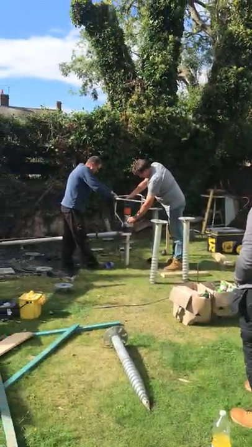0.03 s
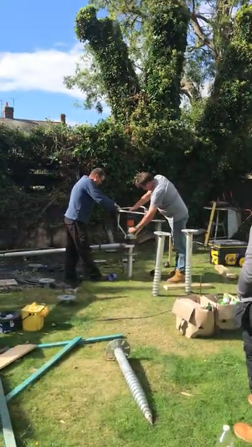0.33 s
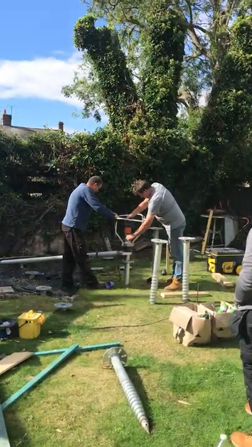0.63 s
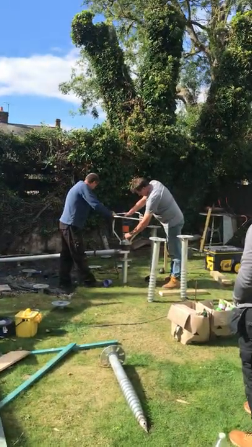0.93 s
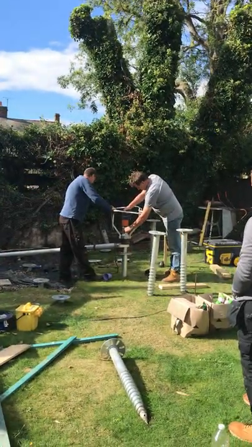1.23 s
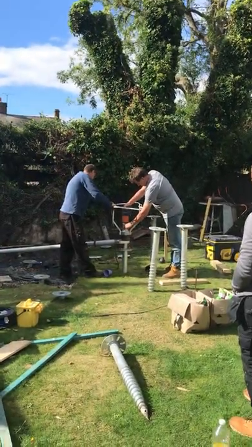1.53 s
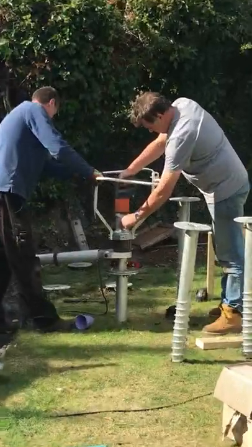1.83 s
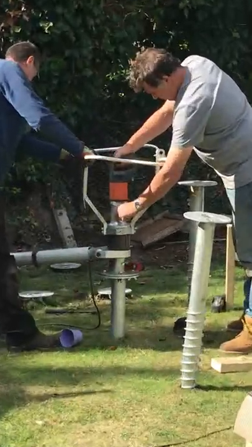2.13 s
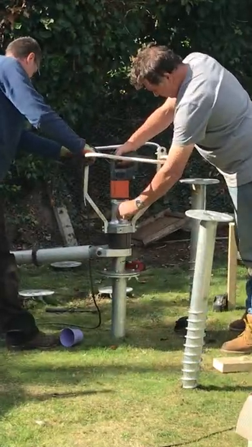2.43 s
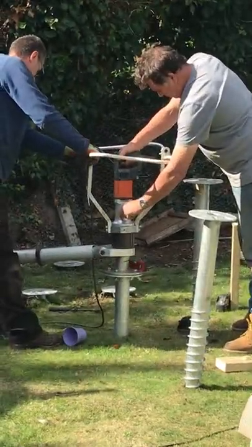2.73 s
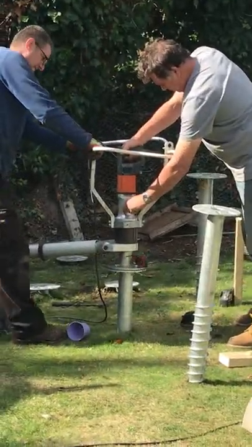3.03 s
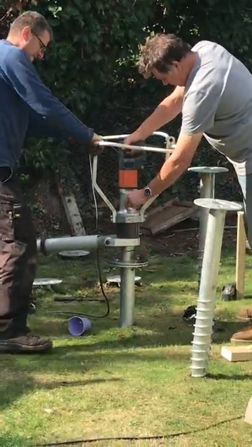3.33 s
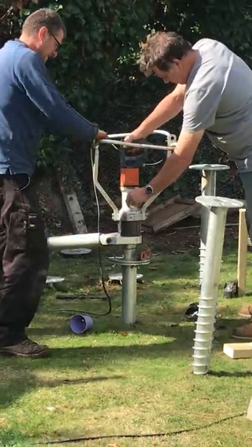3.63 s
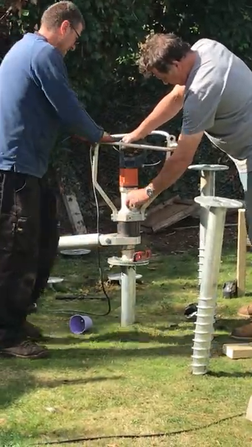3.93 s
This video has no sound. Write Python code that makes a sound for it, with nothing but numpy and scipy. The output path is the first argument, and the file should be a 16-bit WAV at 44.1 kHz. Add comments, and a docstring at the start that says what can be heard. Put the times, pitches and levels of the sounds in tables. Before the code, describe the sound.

Loud, steady whir of an electric ground screw driver, switched off at the very end.

```python
"""An electric ground-screw driver runs under load in an open garden, then is switched off and coasts down.
Its reduction gears sing and chatter in their housing, its armature, fan and commutator whine,
and the brushes hiss in step with the mains over a rush of cooling air. Turning metal squeals briefly.
Behind it, a faint breeze and a few puffs of wind touch the microphone."""
import sys
import numpy as np
from scipy.fft import rfft, irfft, next_fast_len
from scipy.io import wavfile
from scipy.ndimage import map_coordinates

SR = 44100
rng = np.random.default_rng(int(sys.argv[2]) if len(sys.argv) > 2 else 0)


def put_to_file(sound):
    """Save the sound as 16-bit audio at rate SR, in the file named by the first command-line argument."""
    columns = np.atleast_2d(sound).T  # one column per channel
    safe = np.clip(columns, -1, 1)
    whole_steps = np.round(safe * 32767)
    wavfile.write(sys.argv[1], SR, whole_steps.astype(np.int16))


N = 176400

OFF_S, COAST_HZ_PER_S = 3.771, 572  # switch-off, and how fast the armature then slows
MAINS_HZ, TOP_HZ = 50, 15780
# the three gear stages' mesh rates and a slow wheel's rate, as multiples of armature speed
LOW_MESH, MID_MESH, HIGH_MESH, WHEEL_RATIO = 3.509, 7.182, 7.917, .05317
SLOTS, BARS = 14, 40  # armature slots, commutator bars


def gear_whine(turns):
    """Three stages sing at their mesh rates and rattle once the power is off; the slowest also growls."""
    # envelopes of the three mesh tones and the growl: time_s, level_db
    low_level = [(0, -46), (.6, -40), (1.1, -44), (1.6, -37), (2.15, -36.5), (2.4, -46), (3.1, -44),
                 (3.35, -41.5), (3.78, -45), (3.86, -52), (3.95, -48), (4, -57)]
    mid_level = [(0, -38), (.9, -40.5), (1.9, -36.5), (2.6, -40), (3.1, -36.5), (3.77, -41.5), (3.835, -47),
                 (3.865, -31), (3.92, -47), (4, -53)]
    high_level = [(0, -35), (.6, -34), (1, -36), (2, -36.5), (2.65, -34.5), (3.77, -36), (3.87, -45),
                  (3.95, -37), (4, -42)]
    growl_level = [(0, -54), (.9, -45), (1.8, -48), (2.7, -43), (3.4, -49), (3.78, -41.5), (3.86, -55)]
    # harmonics 2, 3 and 4 of the high mesh: relative_db
    overtones_db = [-19.5, -21.5, -38]
    low = envelope(low_level) * tone(LOW_MESH * turns, drift_db=1.6, flutter=.2)
    sidebands = sum(tone((LOW_MESH + k * WHEEL_RATIO) * turns, drift_db=1.5, flutter=.4) for k in (2, 3))
    growl = envelope(growl_level) * sidebands
    mid = envelope(mid_level) * tone(MID_MESH * turns, drift_db=-.4, flutter=.16)
    mid *= wheel_load(turns, swing=.16)
    overtones = sum(amp(db) * tone(k * HIGH_MESH * turns, drift_db=2.5, flutter=.1)
                    for k, db in enumerate(overtones_db, 2))
    high = envelope(high_level) * (tone(HIGH_MESH * turns, drift_db=0, flutter=.086) + overtones)
    backlash = .45 * np.clip((clock() - OFF_S) / .03, 0, 1)  # flutter depth as the teeth run slack
    return growl + sum(stage * (1 + backlash * wobble(250)) for stage in (low, mid, high))


def gear_chatter(turns):
    """Each tooth scrapes through its contact, in irregular surges, and rings the housing."""
    # housing resonances: pitch_hz, width_hz, relative_db
    housing_modes = [(806, 116, -5.5), (1076, 103, -1), (1176, 80, -6), (1344, 60, -12.5), (1728, 170, -6),
                     (2070, 105, -2), (4180, 380, -14)]
    # chatter envelope: time_s, level_db
    chatter_level = [(0, -36.5), (.9, -37), (1.7, -36.5), (2.7, -36), (3.77, -36.5), (4, -48)]

    def housing(f):
        modes = sum(amp(db) * resonance(f, hz, width) for hz, width, db in housing_modes)
        return modes / (1 + (560 / (f + 1)) ** 10)  # steep low cut at 560 Hz

    contact = 1 + cycle(LOW_MESH * turns)
    scrape = rng.standard_normal(N) * np.exp(.12 * wobble(30)) * wheel_load(turns, swing=.26)
    return envelope(chatter_level) * unit(filtered(contact * scrape, housing))


def wheel_load(turns, swing):
    """Tooth pressure swells and eases within each turn of a slow gear wheel."""
    # pressure swings once, twice and three times a wheel turn: weight
    swells = [0.43, 0.66, 1]
    wheel_turns = WHEEL_RATIO * turns
    pressure = sum(weight * cycle(k * wheel_turns) for k, weight in enumerate(swells, 1))
    return unit(np.exp(swing * pressure))


def motor(turns, pace):
    """Unbalance hum, armature and fan tones, the slots' magnetic whine and a thin ring near 3 kHz."""
    # armature and fan tones: speed_multiple
    shaft_orders = [2, 5, 9, 13, 15, 16, 22, 25, 30]
    # the same tones at running speed: level_db
    shaft_db = [-51, -53.5, -56, -55, -55, -58, -58.5, -55.5, -63]
    # envelopes of the slot whine and the ring: time_s, level_db
    slot_level = [(0, -43.5), (.8, -46.5), (1.7, -45.5), (2.45, -41), (2.9, -46), (3.3, -43.5), (3.76, -47),
                  (3.82, -57)]
    ring_level = [(0, -52), (.65, -43), (1.1, -52), (2.1, -48.5), (2.8, -54), (3.8, -48), (4, -60)]
    hum = amp(-58.5) * tone(turns, drift_db=.5, flutter=.071)
    shaft = sum(amp(db) * tone(k * turns, drift_db=.9, flutter=.087)
                for k, db in zip(shaft_orders, shaft_db))
    slots = tone(SLOTS * torque_ripple(turns), drift_db=.4, flutter=.14)
    slots *= envelope(slot_level) * mains_pulse(depth=.39)
    sideband = tone(SLOTS * turns - 2 * MAINS_HZ * clock(), drift_db=1.5, flutter=.17)
    sideband *= amp(-50.5) * (clock() < OFF_S)
    ring = tone(10 * turns, drift_db=.5, flutter=.15)
    ring += amp(-7) * tone(11 * turns, drift_db=0, flutter=.3)
    return hum + shaft * pace ** 5 + slots + sideband + envelope(ring_level) * ring


def mains_pulse(depth):
    """The current peaks twice per mains cycle until the switch is released."""
    return 1 + depth * (clock() < OFF_S) * np.cos(2 * np.pi * 2 * MAINS_HZ * clock())


def torque_ripple(turns, swing_turns=.0022):
    """The armature hurries a little with each peak of the current."""
    return turns + swing_turns * (mains_pulse(depth=1) - 1)


def commutator(turns):
    """The bars whistle under the brushes and buzz at each peak of the current."""
    # envelopes of the whistle and the octave below it: time_s, level_db
    whistle_level = [(0, -38.5), (.5, -38.5), (.7, -43.5), (.9, -39), (1.2, -40.5), (1.35, -44),
                     (1.75, -38), (1.9, -44), (2.35, -41.5), (2.95, -49), (3.4, -39), (3.65, -40.5),
                     (3.78, -45), (3.86, -37), (3.93, -45), (4, -58)]
    sub_octave_level = [(0, -50), (1, -54.5), (2.6, -49.5), (2.9, -56), (3.45, -58), (3.6, -46),
                        (3.85, -60)]
    bar_passes = BARS * torque_ripple(turns)
    whistle = envelope(whistle_level) * tone(bar_passes, drift_db=1, flutter=.15)
    sub_octave = envelope(sub_octave_level) * tone(bar_passes / 2, drift_db=2.5, flutter=.11)
    current_peaks = (mains_pulse(depth=1) / 2) ** 8
    buzz = amp(-51) * unit(current_peaks * cycle((BARS + 1) * turns))
    return whistle + sub_octave + buzz


def brushes(turns):
    """Hiss that pulses with the current and with each turn, and a bright sizzle while the screw bites."""
    # colour of the hiss: frequency_hz, relative_db
    hiss_colour = [(2000, -21), (5000, -2.5), (5700, -5.5), (6350, 2.5), (6850, -1.5), (7400, 1.5),
                   (7850, -4.5), (8400, 4.5), (9900, -1), (10400, -4), (11200, -2.5), (12300, 0),
                   (13200, -6.5), (14200, -8), (15700, -10)]
    # envelopes of the hiss and the sizzle: time_s, level_db
    hiss_level = [(0, -36.5), (.5, -37.5), (.75, -39), (.95, -37.5), (1.35, -38.5), (1.7, -38.5),
                  (2.8, -38.5), (3.7, -36.5), (3.87, -39.5), (4, -50)]
    sizzle_level = [(.85, -58), (1, -41.5), (2, -42), (2.6, -42.5), (3.3, -42.5), (3.55, -52)]
    sizzle = unit(filtered(rng.standard_normal(N), lambda f: resonance(f, hz=8890, width=2760) ** 4))
    hiss = envelope(hiss_level) * noise(hiss_colour) + envelope(sizzle_level) * sizzle
    pulsing = mains_pulse(depth=.04) * (1 + .08 * cycle(turns))
    return hiss * pulsing * amp(.34 * wobble(24.85))


def cooling_air(turns, pace):
    """The fan's rush, weaker as it slows."""
    # colour of the air and bearings: frequency_hz, relative_db
    rush_colour = [(150, -15), (260, -14.5), (350, -20.5), (490, -13), (600, -3.5), (780, 1.5), (920, 0.5),
                   (1200, 3), (1520, -2), (1750, 3), (1920, -3.5), (2400, -2), (2830, -1.5), (3250, 0),
                   (3600, -0.5), (4200, -0.5), (4950, -9.5), (5300, -5), (5700, -9), (8000, -14),
                   (16000, -19)]
    gain = amp(-35.5 + .22 * wobble(6.09)) * pace ** .89
    return gain * noise(rush_colour) * wheel_load(turns, swing=.069)


def squeals(turns):
    """Turning metal sings out for a moment, its pitch tied to the speed."""
    # metallic squeals: peak_s, half_length_s, speed_multiple, level_db
    squeal_cues = [(.28, .05, 11, -41), (3.6, .02, 10.8, -41), (3.825, 0.033, 25, -40.5)]
    return sum(amp(db) * swell(peak_s, half_s) * cycle(k * turns)
               for peak_s, half_s, k, db in squeal_cues)


def wind():
    """A faint breeze with short low puffs on the microphone."""
    # puffs of wind: peak_s, half_length_s, level_db
    puff_cues = [(0.637, .05, -53), (0.737, 0.017, -46), (0.999, 0.017, -36), (1.062, .04, -50),
                 (1.41, .025, -57), (1.64, .04, -60), (2.38, 0.026, -52), (3.79, .02, -46),
                 (3.92, .08, -54)]
    # colour of the wind rumble: frequency_hz, relative_db
    rumble_colour = [(20, -19), (33, -19), (45, 1), (70, -1), (110, -16.5), (200, -24.5), (500, -38)]
    puffs = sum(amp(db) * swell(peak_s, half_s) for peak_s, half_s, db in puff_cues)
    breeze = amp(-68.5 + 2.5 * wobble(8.2))
    return (breeze + puffs) * noise(rumble_colour)


def amp(db):
    """Decibels to gain."""
    return 10 ** (np.asarray(db) / 20)


def unit(x):
    """Scale to rms 1."""
    return x / np.sqrt(np.mean(x ** 2) + 1e-20)


def clock():
    """The time of every sample, in seconds."""
    return np.arange(N) / SR


def curve(rows):
    """(time_s, value) points joined by straight lines."""
    return np.interp(clock(), *np.transpose(rows))


def envelope(rows):
    """A gain that rides through (time_s, level_db) points."""
    return amp(curve(rows))


def swell(peak_s, half_length_s):
    """A bell-shaped fade in and out, 1 at its peak."""
    return np.exp(-((clock() - peak_s) / half_length_s) ** 2)


def wobble(rate):
    """A smooth random curve, rate knots a second."""
    return map_coordinates(rng.standard_normal(int(N * rate / SR) + 4), [clock() * rate])


def filtered(x, response):
    """Shape x with a complex frequency response."""
    size = next_fast_len(N + SR // 2)
    return irfft(rfft(x, size) * response(np.fft.rfftfreq(size, 1 / SR)), size)[:N]


def noise(colour):
    """Noise of rms 1 coloured by (frequency_hz, relative_db) points."""
    hz, db = np.transpose(colour)
    white = rng.standard_normal(N)
    return unit(filtered(white, lambda f: amp(np.interp(np.log(f + 1), np.log(hz), db))))


def resonance(f, hz, width):
    """Response of one resonance, 1 at its centre."""
    return 1j * f * width / (hz * hz - f * f + 1j * f * width)


def cycle(turns):
    """A sine that follows a count of turns, from a random start."""
    return np.sin(2 * np.pi * (turns + rng.random()))


def tone(turns, drift_db, flutter):
    """A machine tone of rms about 1: it drifts slowly in level and flutters in level and phase."""
    level = amp(drift_db * wobble(4.11)) * (1 + flutter * wobble(70))
    return np.sqrt(2) * level * cycle(turns + flutter * wobble(70) / (2 * np.pi))


def scene():
    """One armature speed drives every part of the machine; both channels hear the same."""
    # armature speed under load: time_s, turns_per_s
    loaded_speed = [(0, 298.1), (.5, 296.9), (.85, 296.1), (.95, 295.1), (1.5, 293.6), (1.95, 292.8),
                    (2.5, 292.3), (2.95, 294.3), (3.3, 293.6), (3.62, 295.1), (3.77, 295.5)]
    speed = curve(loaded_speed) - COAST_HZ_PER_S * np.maximum(clock() - OFF_S, 0)
    turns = np.cumsum(speed) / SR
    pace = speed / np.median(speed)  # 1 at running speed
    drive = motor(turns, pace) + commutator(turns) + brushes(turns) + cooling_air(turns, pace)
    gears = gear_whine(turns) + gear_chatter(turns)
    return np.tile(drive + gears + squeals(turns) + wind(), (2, 1))


def record(dry):
    """A brick-wall high cut takes off the very top."""
    return np.array([filtered(x, lambda f: f < TOP_HZ) for x in dry])


dry = scene()
out = record(dry)
put_to_file(out)
```